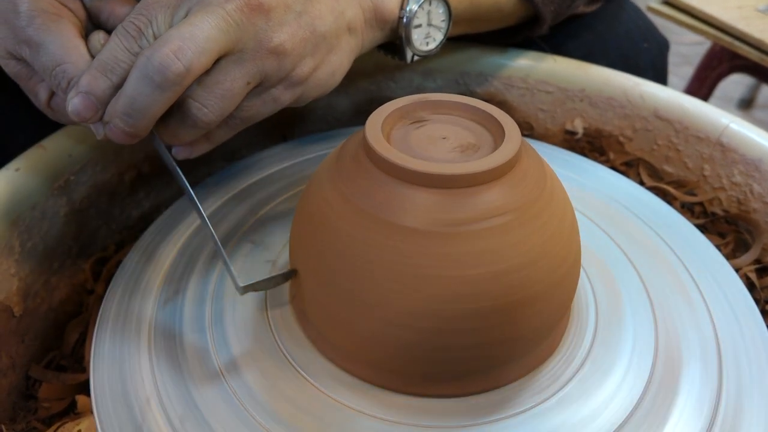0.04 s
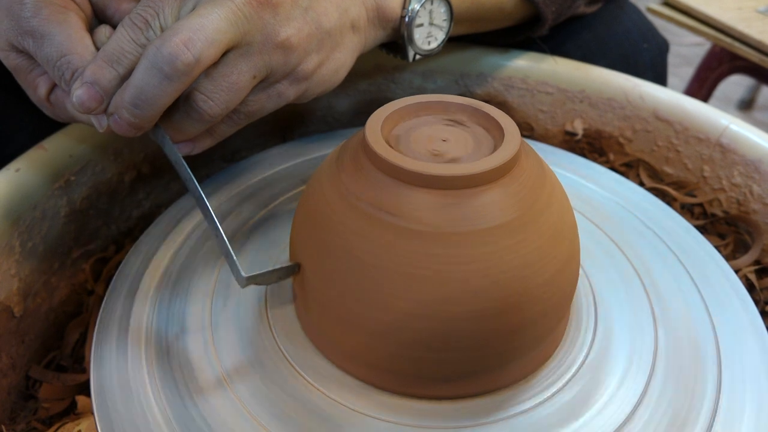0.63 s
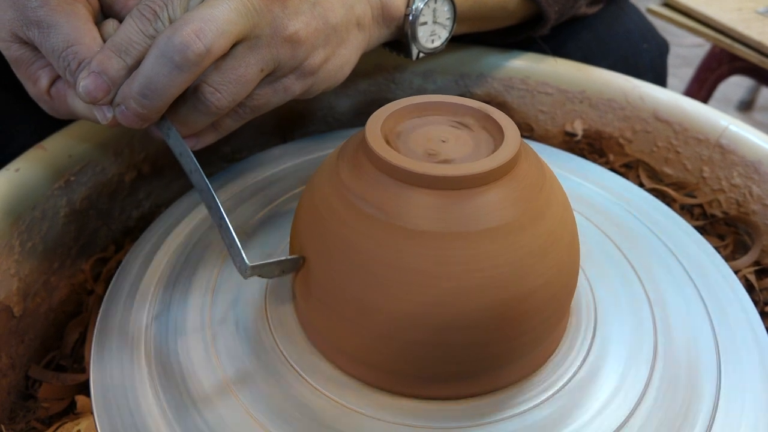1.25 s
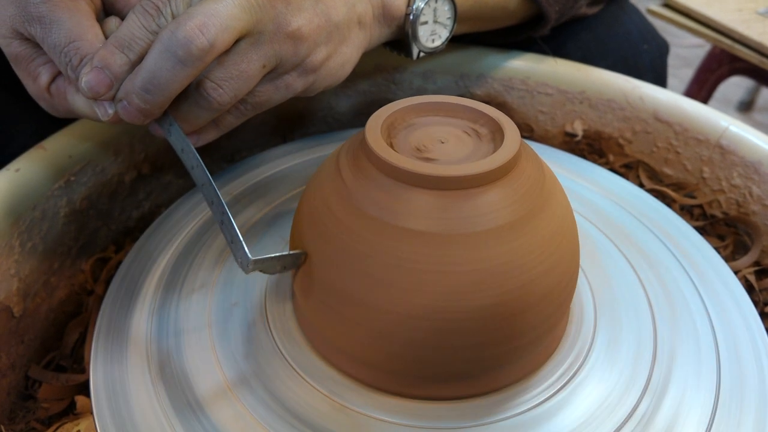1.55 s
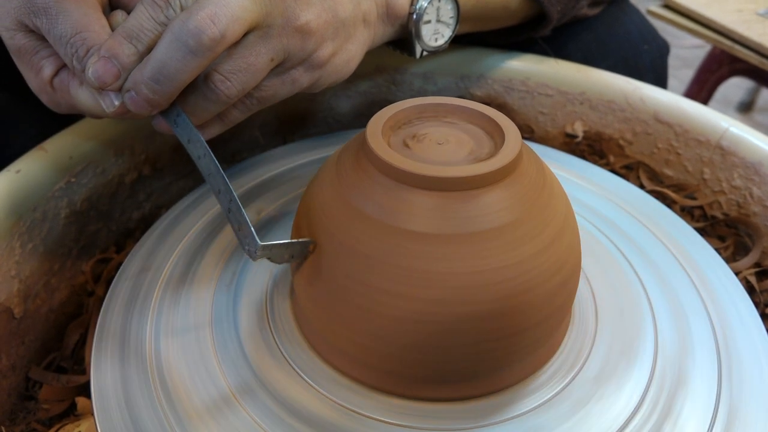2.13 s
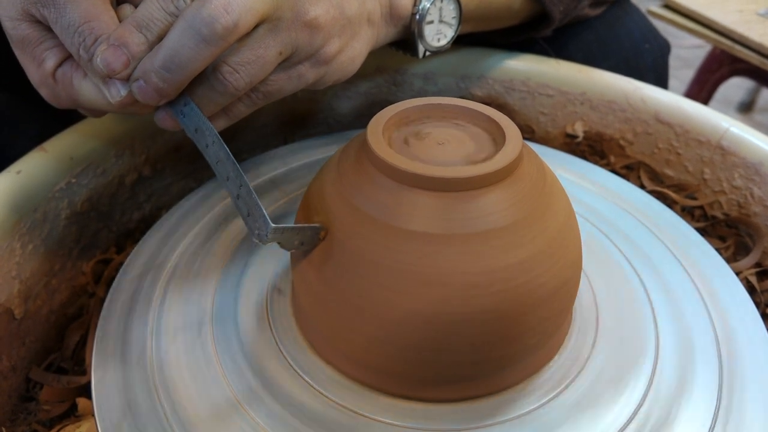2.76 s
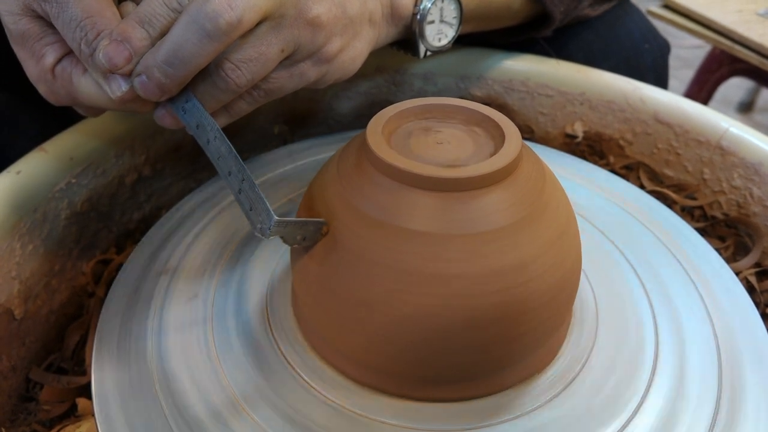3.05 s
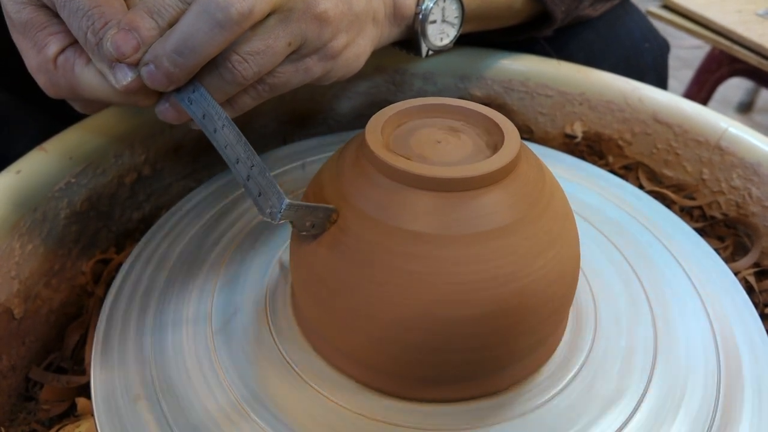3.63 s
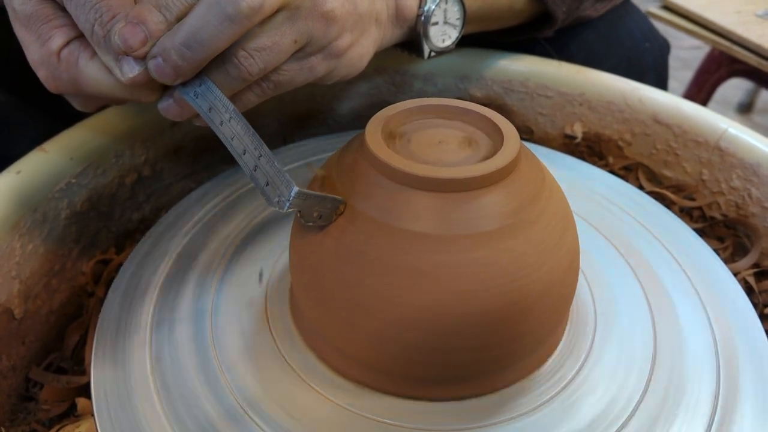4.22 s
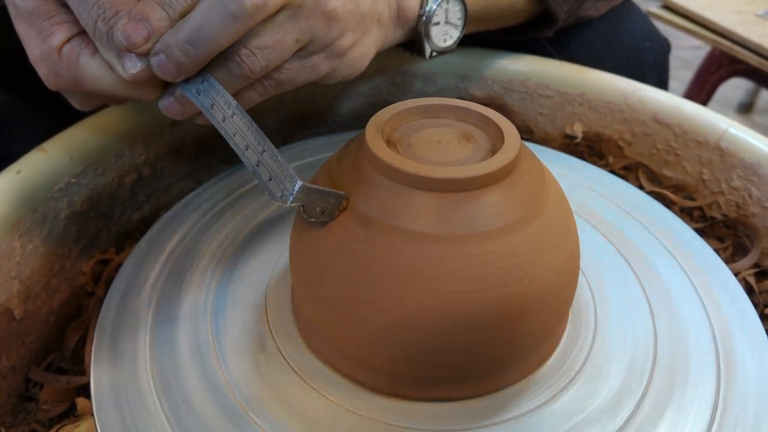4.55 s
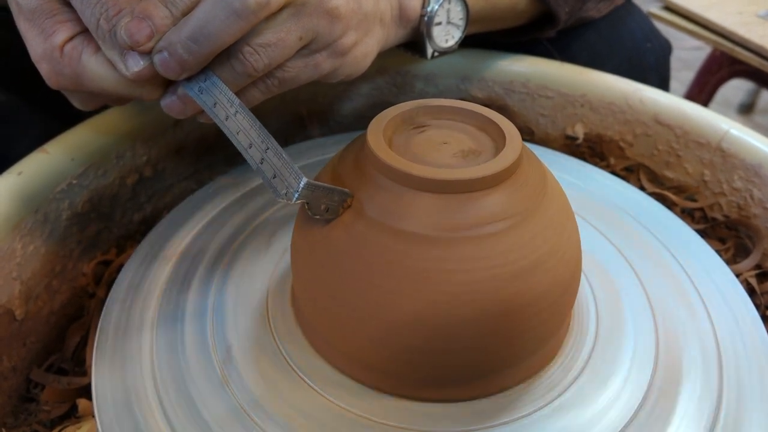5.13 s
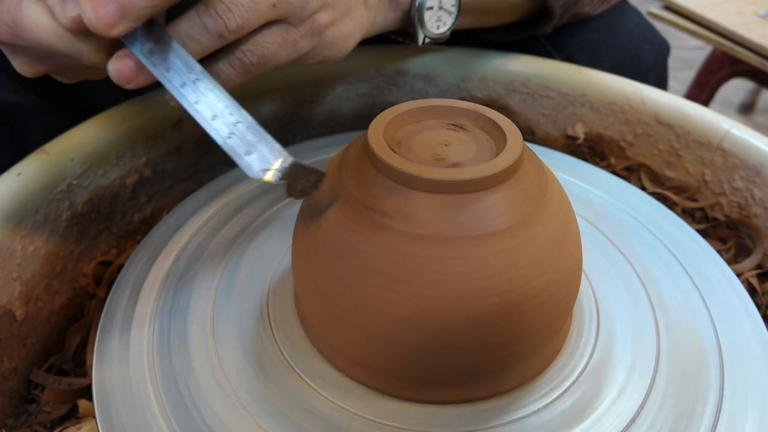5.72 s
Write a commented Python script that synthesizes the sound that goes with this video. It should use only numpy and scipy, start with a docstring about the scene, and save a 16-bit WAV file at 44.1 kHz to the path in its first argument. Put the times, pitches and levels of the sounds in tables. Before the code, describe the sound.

A steel trimming tool buzzes, squeaks and rattles against a spinning clay bowl, then lifts off, leaving the potter's wheel humming.

```python
"""A buzzing, singing scrape: a steel trimming tool shaves a firm clay bowl on an electric potter's wheel.
The blade sticks and slips about 285 times a second, ringing itself and the bowl, and bites harder at the
wall's high spots, turn after turn. It sings and whistles on its tip, then rolls onto its flat edge and
rattles; the clay crumbles and hisses under it, and firmer patches squeak. At the end the tool lifts off,
leaving the motor's hum in a small room."""
import sys
import numpy as np
from scipy import signal
from scipy.fft import rfft, irfft, next_fast_len
from scipy.io import wavfile
from scipy.ndimage import uniform_filter1d, map_coordinates

SR = 44100
rng = np.random.default_rng(int(sys.argv[2]) if len(sys.argv) > 2 else 0)


def materialize(psi):
    """Save the field psi as 16-bit PCM at rate SR to the path in sys.argv[1].

    A 1-D psi becomes a single channel; in a 2-D psi each row is a channel.
    """
    bounded = np.clip(np.atleast_2d(psi).T, -1, 1)
    quanta = np.round(bounded * 32767).astype(np.int16)
    wavfile.write(sys.argv[1], SR, quanta)


N = 254898
TIME_S = np.arange(N) / SR
LIFT_S = 5.36
GRIT = .13  # share of noise in the force of each slip


def undb(db):
    """Decibels to gain."""
    return 10 ** (np.asarray(db) / 20)


def unit(x):
    """Scale to rms 1."""
    return x / np.sqrt(np.mean(x ** 2))


def even(x, window_s):
    """Scale to a running rms of 1."""
    size = int(window_s * SR)
    return x / np.sqrt(uniform_filter1d(uniform_filter1d(x ** 2, size), size) + 1e-12)


def curves(table):
    """Columns after time_s, interpolated per sample."""
    time_s, *columns = np.transpose(table)
    return [np.interp(TIME_S, time_s, column) for column in columns]


def walk(rate_hz):
    """Smooth random drift, rms 1."""
    size = int(SR / rate_hz)
    drift = uniform_filter1d(rng.standard_normal(N), size, mode="wrap")
    return unit(uniform_filter1d(drift, size, mode="wrap"))


def colour(x, points):
    """Filter by (freq_hz, gain_db) points."""
    hz, db = np.transpose(points)
    size = next_fast_len(N + SR // 4)
    bins_hz = np.maximum(np.fft.rfftfreq(size, 1 / SR), 1)
    gain = undb(np.interp(np.log(bins_hz), np.log(hz), db))
    return irfft(rfft(x, size) * gain, size)[:N]


def ring(x, modes, roll):
    """Resonances, each two peak filters in series, whose strengths shift as the blade rolls."""
    out = 0
    for k, (hz, width_hz, *db) in enumerate(modes):
        b, a = signal.iirpeak(hz, hz / width_hz, fs=SR)
        mode = signal.lfilter(b, a, signal.lfilter(b, a, x))
        gain = undb(np.interp(roll, [0, 1, 2], db))
        out = out + (-1) ** k * gain * mode  # neighbours swing in opposite senses
    return out


def swells(rows, squareness=3.2):
    """Summed power of (centre_s, level_db, length_s) swells; squarer ones catch, hold and let go."""
    power = np.zeros(N)
    for centre_s, db, length_s in rows:
        near = slice(*(max(int((centre_s + way * 2 * length_s) * SR), 0) for way in (-1, 1)))
        distance = np.abs(2 * (TIME_S[near] - centre_s) / length_s)
        power[near] += undb(db) ** 2 * np.exp(-distance ** squareness)
    return power


def touching(fade_db_per_s=294):
    """1 while the tool is on the clay, fading once it lifts."""
    return undb(-fade_db_per_s * np.maximum(TIME_S - LIFT_S, 0))


def looseness(bite):
    """1 in a light cut; falls as a hard bite steadies the blade."""
    return np.clip(bite ** -2, .55, 1)


# hand pressure: time_s, cut_db, high_spot_db
PRESSURE = [(0, -25, -27.5), (0.699, -22.5, -26.5), (1.8, -22, -25.5), (2.102, -25, -30.5),
            (2.349, -25.5, -32), (2.65, -30, -35.5), (3.1, -31, -36), (3.7, -33, -39), (4.3, -35, -40),
            (4.75, -37.5, -43), (5, -33.5, -36), (5.3, -31, -37), (5.36, -36, -45)]
# high spots of the wall: time_in_turn_s, offset_db, length_s
HIGH_SPOTS = [(0.068, 0, 0.02), (0.101, -0.5, 0.056), (0.184, 0, 0.055), (0.233, -3, 0.0247),
              (0.275, -3.5, .022), (0.327, 3, 0.0464)]
def high_spot_passes(turn_s=.3388, spread_s=.0038, spread_db=1):
    """Swell rows: each high spot meets the blade once a turn, about as hard as the hand presses."""
    time_s, _, pressure_db = np.transpose(PRESSURE)
    rows = []
    for turn in range(-1, int(LIFT_S / turn_s) + 1):
        for in_turn_s, offset_db, length_s in HIGH_SPOTS:
            centre_s = turn * turn_s + in_turn_s
            level_db = offset_db + np.interp(centre_s, time_s, pressure_db)
            late, hard = rng.standard_normal(2)
            if centre_s + length_s > 0:
                rows.append((centre_s + spread_s * late, level_db + spread_db * hard, length_s))
    return rows


# the blade catches and digs in: centre_s, level_db, length_s, steel_extra_db
DIGS = [(0.807, -19.5, 0.037, -24), (.897, -22.5, 0.017, -8), (0.995, -20, 0.025, -17),
        (1.091, -25, 0.043, 0), (1.171, -24, 0.019, -20), (1.283, -20, 0.043, -4), (1.351, -20, 0.03, 1),
        (1.433, -21.5, 0.062, 3), (1.497, -19.5, 0.028, -4.5), (1.567, -22, 0.03, -12),
        (1.654, -20.5, 0.019, -1), (1.744, -20, .02, -1.5), (1.805, -18, 0.033, -1), (1.954, -20, 0.065, 2),
        (2.012, -17.5, 0.029, -0.5), (2.093, -20, 0.02, -6), (2.199, -20.5, 0.031, -1),
        (2.291, -23, 0.026, 3.5), (2.392, -24, 0.025, -5), (2.436, -23, 0.034, -3.5),
        (2.506, -22, 0.038, -2.5), (2.553, -26, 0.016, 6), (2.621, -24, 0.023, 3.5),
        (2.715, -20, 0.045, -1.5), (2.765, -19, 0.032, -3.5), (2.817, -22.5, 0.042, 1),
        (2.882, -19.5, 0.031, 0), (2.935, -23, 0.039, -1), (2.991, -19, 0.027, -0.5),
        (3.051, -19, 0.054, 0), (3.131, -22.5, 0.03, 1.5), (3.206, -24.5, .035, 1.5),
        (3.278, -20.5, .066, 1.5), (3.356, -23, 0.036, 2), (3.435, -22, 0.055, -3),
        (3.563, -28.5, 0.043, 2), (3.639, -26.5, 0.017, -2.5), (3.705, -19.5, 0.08, -1.5),
        (3.793, -27.5, 0.024, -11), (3.912, -22, 0.0686, -0.5), (4.064, -21, 0.025, -1),
        (4.124, -23.5, 0.045, -2), (4.184, -23.5, 0.02, -5.5), (4.239, -30.5, .02, -13),
        (4.391, -22, .023, -3.5), (4.488, -32.5, 0.019, -2), (4.522, -30, .028, -8.5),
        (4.619, -30, 0.057, -21), (4.708, -28, 0.016, -1), (4.736, -27.5, 0.026, -2.5),
        (4.832, -23, 0.0216, 2), (4.862, -23.5, 0.0196, -1), (4.937, -24.5, 0.059, -1),
        (4.998, -28, 0.019, 0), (5.067, -22, 0.058, 1), (5.15, -21, .036, 5), (5.191, -20, .042, 1),
        (5.245, -25, 0.036, 2.5), (5.286, -20.5, 0.046, 2), (5.345, -24, 0.044, -10)]
def cutting_force():
    """Forces on bowl and steel: steady cut, high spots and digs add as powers."""
    cut = undb(curves(PRESSURE)[0]) ** 2 + swells(high_spot_passes())
    bowl_digs = swells([(s, db, length_s) for s, db, length_s, _ in DIGS])
    steel_digs = swells([(s, db + extra_db, length_s) for s, db, length_s, extra_db in DIGS])
    return np.sqrt(cut + bowl_digs) * touching(), np.sqrt(cut + steel_digs) * touching()


# stick-slip rate: time_s, base_rate_hz
SLIP_RATE = [(0, 294), (.95, 294.4), (1.15, 297.2), (1.35, 285.1), (2.6, 287.6), (3.3, 280.1),
             (4.85, 284.4), (5.1, 278.2), (5.3, 278.7)]
def slips(bite, surge, scatter, sag=.042, surge_dip=.036, drift=.009, lock=.79, spread_db=3):
    """Slip pulses, the gush of clay after each, and their count; bites and surges slow and steady them."""
    hz = curves(SLIP_RATE)[0] * bite ** -sag * (1 - surge_dip * surge) * (1 + drift * walk(22.12))
    jitter = scatter / bite * (1 - lock * surge) * (.75 * walk(50.37) + walk(401))
    cycles = np.cumsum(hz * (1 + jitter)) / SR
    at = np.flatnonzero(np.diff(np.floor(cycles)) > 0)
    late = (np.ceil(cycles[at]) - cycles[at]) / (cycles[at + 1] - cycles[at])  # share of a sample
    size = undb(spread_db * looseness(bite[at]) * rng.standard_normal(len(at)))
    pulses = np.zeros(N)
    pulses[at], pulses[at + 1] = size * (1 - late), size * late
    gush = .45 + np.exp(-(cycles % 1) / .3)
    return unit(pulses), gush, cycles


# hops of the blade: time_s, depth_db
HOP_DEPTH = [(0, 1), (1.9, 1), (2.25, 2.5), (2.6, 3), (3.5, 2), (4.7, 2), (5.3, 1.5)]
def hopping(rate_hz=38.44, uneven=.1666):
    """Gain that chops the cut as the blade hops along the wall."""
    cycles = np.cumsum(rate_hz * (1 + uneven * walk(31.8))) / SR
    return even(undb(curves(HOP_DEPTH)[0] * np.sin(2 * np.pi * cycles)), .1)


# resonances of blade and bowl: freq_hz, width_hz, tip_db, corner_db, flat_db
BODY_MODES = [(255, 83, -13.5, -10.5, -10.5), (596.3, 86.7, 6.5, 5.5, 7), (813, 170, 4, -17, 15.5),
              (1036, 193, 9, -34, -38), (1413, 140, -4.5, -7.5, -14), (1563, 140, -58, -13, -20),
              (1742, 160, -5.5, -11, 0), (2000, 360, -10, -10, 0), (2090, 154, -4, -7, 8.5),
              (2271, 170, -2, -9.5, -7), (2561, 157, -14, -11.5, 2), (2610, 430, -2, -55, -39),
              (3330, 130, -21, -16.5, -18), (3656, 510, -3, -28.5, 2), (5234, 173, -57, -30, -24)]
def chatter(pulses, gush, bowl_force, steel_force, bite, roll, split_hz=1200, build_s=.0042, limit=4.1):
    """Slips ring blade and bowl; a hard bite lets go more abruptly and sounds brighter."""
    drive = pulses + GRIT * gush * rng.standard_normal(N)
    tone = even(ring(drive, BODY_MODES, roll), .048)
    blade = signal.sosfiltfilt(signal.butter(2, split_hz, "high", fs=SR, output="sos"), tone)
    bowl = limit * np.tanh((tone - blade) / limit)  # clay damps the widest swings
    brightness = bite ** np.interp(roll, [0, 1], [.076, .058])
    # the heavy bowl lags; the light blade answers at once
    pole = np.exp(-1 / (build_s * SR))
    swing = signal.lfilter([1 - pole], [1, -pole], bowl_force, zi=[pole * bowl_force[0]])[0]
    bowl_flutter = undb(2 * looseness(bite) * walk(60))
    blade_flutter = undb(1.4 * looseness(bite) * walk(36))
    return swing * bowl * bowl_flutter + steel_force * blade * brightness * blade_flutter


def snaps(pulses, band_hz=(1700, 3000)):
    """Each slip lets go with a dry tick."""
    return unit(signal.sosfilt(signal.butter(2, band_hz, "band", fs=SR, output="sos"), pulses))


# surges of the tip, about three a turn: centre_s, level_db, length_s
SURGES = [(.01, -28.5, .035), (0.092, -27.5, 0.056), (0.172, -28.5, 0.06), (0.265, -27.5, .06),
          (0.402, -29, 0.055), (0.54, -25.5, 0.091), (0.637, -27, .05), (0.752, -28.5, 0.039),
          (0.85, -30, 0.05)]
# overtones of the slip rate: harmonic, relative_db
OVERTONES = [(3, 1.5), (4, -8), (5, -5), (7, -4.5), (8, 0), (9, -4), (10, -6), (12, -17), (13, -21)]
def singing(slip_cycles, waver_db=3, rough_cycles=.055):
    """In a surge the tip sings overtones of the slip rate, each rough and wavering."""
    song = 0
    for harmonic, db in OVERTONES:
        gain = undb(db + waver_db * walk(40))
        cycles = harmonic * slip_cycles + rng.random() + rough_cycles * walk(110)
        song = song + gain * np.sin(2 * np.pi * cycles)
    return even(song, .12) * np.sqrt(swells(SURGES, squareness=4))


# whistle of the tip, gone as the blade rolls off it: time_s, level_db
WHISTLE_LEVEL = [(0, -33), (.05, -30), (.17, -31.5), (.25, -26.5), (.285, -38.5), (.355, -29), (.39, -41.5),
                 (0.519, -27), (0.641, -31.5), (.71, -37.5), (.76, -32), (.81, -36), (0.861, -27),
                 (0.889, -38), (1.2, -36), (1.6, -49), (1.9, -80)]
def whistling(pitch_hz=1692, rise_hz_per_db=7, max_rise_hz=105.6, waver_db=2, wobble_hz=9):
    """The tip whistles on a mode of its own, going sharp as it weakens."""
    db = curves(WHISTLE_LEVEL)[0] + waver_db * walk(32)
    loudest_db = max(level_db for _, level_db in WHISTLE_LEVEL)
    rise_hz = np.clip(rise_hz_per_db * (loudest_db - db), 0, max_rise_hz)
    hz = pitch_hz + rise_hz + wobble_hz * walk(85)
    return np.sqrt(2) * undb(db) * np.sin(2 * np.pi * np.cumsum(hz) / SR)


def grains(per_s, spread_db):
    """Dense tiny clicks of uneven size."""
    size = undb(spread_db * np.minimum(rng.exponential(size=N), 5))
    return unit((rng.random(N) < per_s / SR) * rng.standard_normal(N) * size)


# spectrum of crumbling clay: freq_hz, gain_db
CRUMB_SPECTRUM = [(100, -18), (200, 1), (350, 1), (520, 11), (700, 7), (1000, 3.5), (1500, 3.5), (2200, 0),
                  (3000, -4.5), (4000, -7.5), (5500, -15), (7500, -26.5), (10000, -36), (15000, -60)]
def crumbling(gush):
    """Clay breaks away in grains, loudest just after each slip."""
    return unit(colour(gush * grains(per_s=12000, spread_db=.77), CRUMB_SPECTRUM))


# high modes of the rubbed steel: base_freq_hz, width_hz, tip_db, corner_db, flat_db
HISS_MODES = [(7200, 5900, 5.5, -0.5, -3), (8280, 260, -3, 10, -8), (9560, 2200, -17, 2, -8),
              (10390, 300, -6, 8, 8), (11060, 3000, -9, 6, -4), (12060, 300, -9, 4, 9),
              (12540, 330, 2, 11, -6), (13550, 750, -5, 0, 1), (16050, 1800, 4, 2.5, 1)]
# their sinking as the contact spreads: time_s, freq_ratio
HISS_SINK = [(0, 1.03), (2.5, 1.025), (4.8, .995)]
def rubbing(gush, roll, stray=.2):
    """Fine grit slides under the steel and hisses in its modes; the contact strays along the edge."""
    grit = (1 + .5 * gush) * grains(per_s=11000, spread_db=1.4)
    hiss = ring(grit, HISS_MODES, roll + stray * walk(3.9))
    position = np.cumsum(curves(HISS_SINK)[0])
    return even(map_coordinates(hiss, [position], order=3, mode="mirror"), .4)


# motor and drive tones: pitch_hz, rms_db, waver_db
HUM_TONES = [(120, -48.3, .7), (167, -49.7, 2), (205, -51, 2.5), (218, -52, 2.5), (450, -55, 2.5),
             (480, -47, 1.5), (599.5, -52, 1), (780, -59, 2)]
# spectrum of bearings and wheel head: freq_hz, gain_db
WHIRR_SPECTRUM = [(18, -32), (32, -12), (80, -19.5), (105, 2), (150, 3), (210, 4.5), (300, 4.5), (420, 4.5),
                  (700, 2), (1200, 0), (2000, -4.5), (2600, -12.5), (4000, -14.5), (8000, -29),
                  (15000, -37)]
def wheel(whirr_db=-39.5, whirr_waver_db=1.2):
    """The motor hums on mains harmonics; the drive's tones waver over the whirr of the bearings."""
    hum = 0
    for hz, db, waver_db in HUM_TONES:
        amplitude = np.sqrt(2) * undb(db + waver_db * walk(5.5))
        phase_drift = .35 * waver_db * walk(11)
        hum = hum + amplitude * np.sin(2 * np.pi * hz * TIME_S + phase_drift)
    whirr = unit(colour(rng.standard_normal(N), WHIRR_SPECTRUM))
    return hum + whirr * undb(whirr_db + whirr_waver_db * walk(20))


# squeaks on firmer clay: centre_s, rasp_relative_db, chirp_hz, chirp_db
SQUEAKS = [(.14, -36, 3500, -38), (.255, -36, 5050, -46), (.293, -25.5, 3720, -34), (.343, -41, 3690, -38),
           (.398, -31, 3530, -34), (.425, -42.5, 3520, -43), (.527, -30, 4920, -39), (.572, -32, 5040, -43),
           (.658, -28, 3520, -33), (.685, -31, 3550, -44), (.725, -40, 3600, -47), (.775, -34, 3580, -32.5),
           (.875, -30, 3680, -40), (1.035, -28.5, 3660, -36), (1.105, -28.5, 3560, -35),
           (1.146, -35.5, 3550, -38), (1.241, -26, 3480, -41), (1.334, -28, 3650, -42),
           (1.453, -27.5, 4945, -39), (1.741, -33, 3580, -43), (1.809, -41, 3650, -45),
           (1.965, -35, 3650, -47), (2.82, -35, 5097, -48), (2.884, -28, 5334, -43), (3.03, -31, 5180, -42),
           (3.677, -28.5, 5249, -48), (5.149, -31, 5148, -49)]
# high modes of the edge: freq_hz, width_hz, tip_db, corner_db, flat_db
EDGE_MODES = [(3567, 190, 10.5, 8, -16), (3970, 300, -12, 8, -8), (5000, 470, -0.5, 0.5, 2),
              (6300, 1400, -10, -13.5, -19), (8350, 3500, -19, -18, 3)]
def squeak_rasps(pulses, gush, force, bite, roll, gain_db=-11, faint_db=-26, width_s=.011, stray=.12):
    """Slips ring the edge's high modes: briefly at each squeak, faintly whenever the blade bites."""
    swell = force * bite ** .14 * undb(faint_db + 2.5 * walk(27))
    for centre_s, rasp_db, _, _ in SQUEAKS:
        near = slice(max(int((centre_s - .06) * SR), 0), int((centre_s + .08) * SR))
        from_peak_s = TIME_S[near] - centre_s - .003
        swell[near] += undb(rasp_db + gain_db) * np.exp(-(from_peak_s / width_s) ** 2)
    spot = np.abs(roll + stray * walk(12))
    drive = pulses + 2 * GRIT * gush * rng.standard_normal(N)
    return swell * even(ring(drive, EDGE_MODES, spot), .012)


def squeak_chirps(width_s=.0071, wobble=.008):
    """In each squeak one high mode of the edge rings out as a short metallic chirp."""
    clock_s = np.cumsum(1 + wobble * walk(150)) / SR
    out = np.zeros(N)
    for centre_s, _, hz, db in SQUEAKS:
        near = np.abs(TIME_S - centre_s) < 3 * width_s
        envelope = np.sqrt(2) * undb(db) * np.exp(-((TIME_S[near] - centre_s) / width_s) ** 2)
        out[near] += envelope * np.sin(2 * np.pi * hz * clock_s[near])
    return out


def reflections(x, t60_s):
    """Dense, fading echoes at unit power gain."""
    t = np.arange(SR // 2) / SR
    echoes = rng.standard_normal(len(t)) * undb(-60 * t / t60_s) * (t > .001)
    return signal.fftconvolve(x, echoes / np.sqrt(np.sum(echoes ** 2)))[:N]


# tilt of the blade: time_s, roll (0 tip, 1 corner, 2 flat edge)
BLADE_ROLL = [(0, 0.029), (.65, 0.24), (.88, 0.42), (1.2, 0.5), (2.2, 0.4), (3.1, 0.9), (4.5, 1.033),
              (4.85, 1.42), (5.28, 1.29), (5.36, 0.67)]
# the clay's response: roll, slip_scatter_ratio, crumble_db, hiss_db, snap_db, chatter_db
CONTACT = [(0, .022, -3.5, -47.5, -25, -2.5), (0.498, 0.034, -6.5, -49.5, -29.5, -3.5),
           (1.001, .022, -8.5, -52, -18.5, -2.5), (2, 0.022, -7, -48, -13, -1.8)]
def trimming(stall_db=-34.5, scattered_db=-1.5):
    """The blade shaves the wall: returns the direct scrape and the part scattered sideways."""
    roll, = curves(BLADE_ROLL)
    rolls, *columns = np.transpose(CONTACT)
    scatter, crumble_db, hiss_db, snap_db, chatter_db = (np.interp(roll, rolls, c) for c in columns)
    force, steel_force = cutting_force()
    mean_force = uniform_filter1d(force, int(.8 * SR))
    bite = np.clip(force / (mean_force + 1e-9), .4, 1.8)
    surge_power = swells([(s, 0, length_s) for s, _, length_s in SURGES], squareness=2)
    surge = np.minimum(np.sqrt(surge_power), 1)
    pulses, gush, slip_cycles = slips(bite, surge, scatter)
    hops = hopping() ** looseness(bite)
    grip = hops * force / np.hypot(force, undb(stall_db))  # a light cut stalls and mostly crumbles
    judder = undb(chatter_db) * chatter(pulses, gush, force * grip, steel_force * grip, bite, roll)
    ticks = undb(snap_db) * steel_force * grip * snaps(pulses)
    squeaks = squeak_rasps(pulses, gush, force, bite, roll) + squeak_chirps()

    def friction():
        """Crumbs and hiss from many points along the edge, fresh on each call."""
        crumbs = crumbling(gush) * hops * np.sqrt(force * steel_force) * bite ** -.65
        return undb(crumble_db) * crumbs + undb(hiss_db) * touching() * rubbing(gush, roll)

    direct = judder + ticks + singing(slip_cycles) + whistling() + squeaks + friction()
    scattered = friction() + reflections(squeaks + ticks, t60_s=.014)
    return direct, undb(scattered_db) * scattered


# sound arriving from the sides: freq_hz, gain_db
SIDE_SPECTRUM = [(30, -17), (70, -25), (120, -61), (170, -72), (300, -18), (580, -21.5), (900, -12.5),
                 (1400, -4), (2200, -7), (4000, -5), (8000, -1), (15000, -3.5)]
# treble leans left, towards the tool: freq_hz, left_minus_right_db
LEAN = [(1000, 0.5), (2300, -0.5), (4000, 2), (8000, 2), (12000, 0.5)]
def scene(room_db=-18, echo_db=-3):
    """Tool and wheel in a short room tail; splash pan and near walls throw treble back from the sides."""
    scrape, scattered = trimming()
    direct = scrape + wheel()
    mid = direct + undb(room_db) * reflections(direct, t60_s=.45)
    side = colour(scattered + undb(echo_db) * reflections(direct, t60_s=.043), SIDE_SPECTRUM)
    left = colour(mid + side, [(hz, db / 2) for hz, db in LEAN])
    right = colour(mid - side, [(hz, -db / 2) for hz, db in LEAN])
    return np.array([left, right])


def record(dry):
    """Steep low-pass on the top treble."""
    top_hz = 15750
    return signal.sosfilt(signal.ellip(10, .2, 80, top_hz, fs=SR, output="sos"), dry)


dry = scene()
out = record(dry)
materialize(out)
```